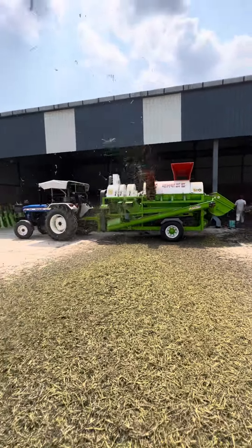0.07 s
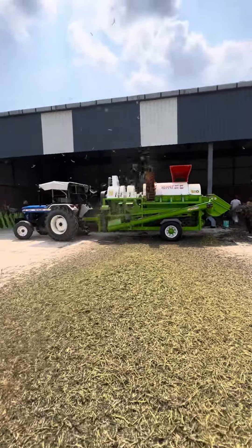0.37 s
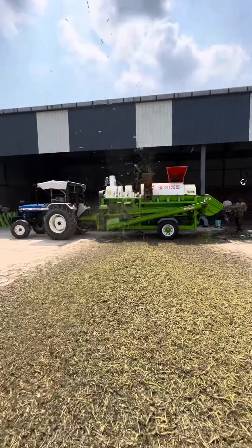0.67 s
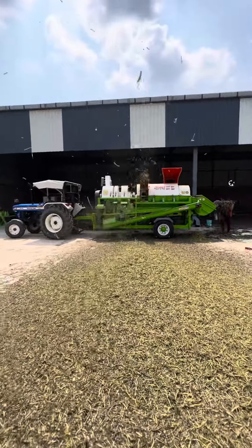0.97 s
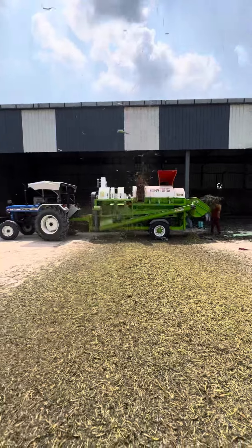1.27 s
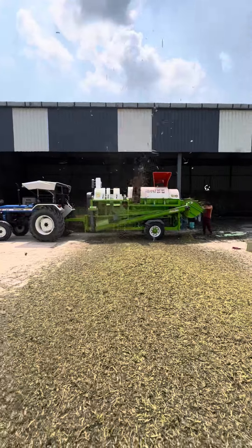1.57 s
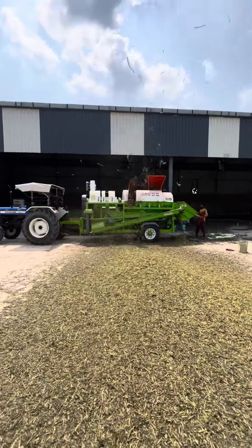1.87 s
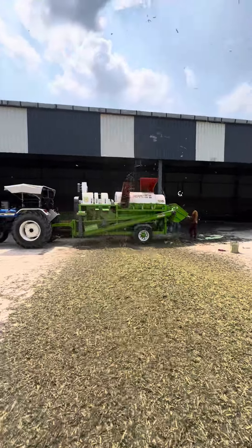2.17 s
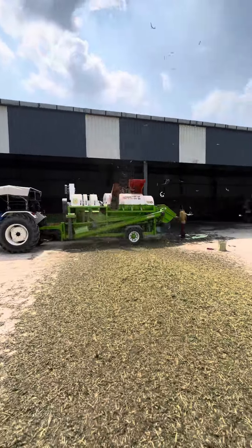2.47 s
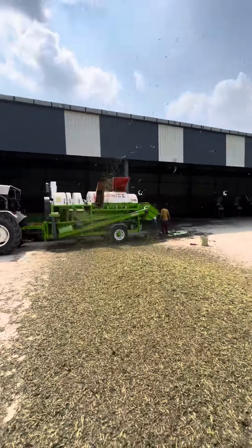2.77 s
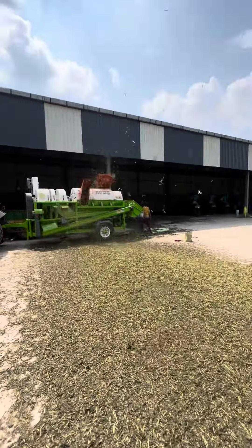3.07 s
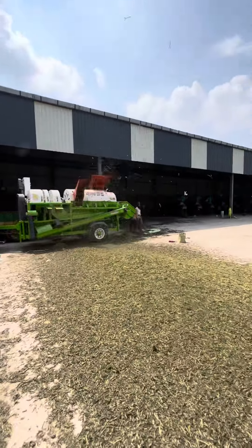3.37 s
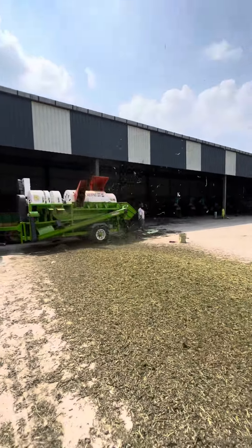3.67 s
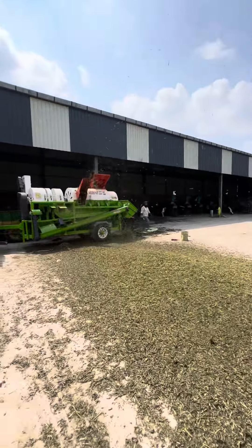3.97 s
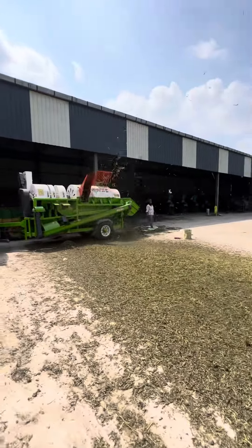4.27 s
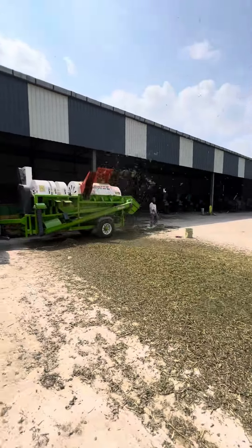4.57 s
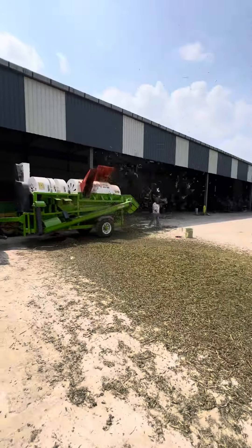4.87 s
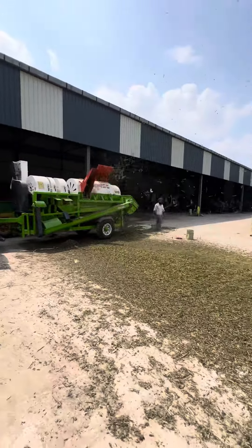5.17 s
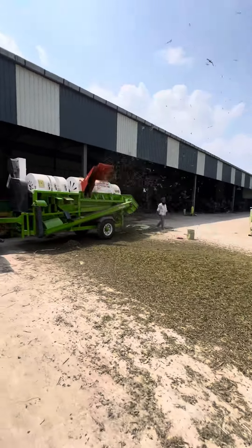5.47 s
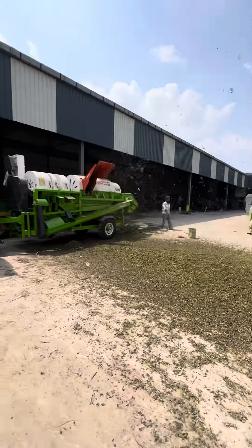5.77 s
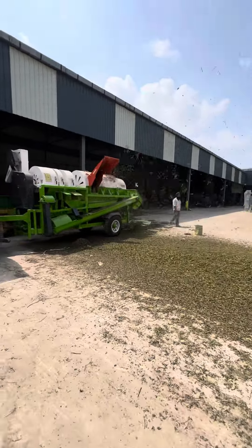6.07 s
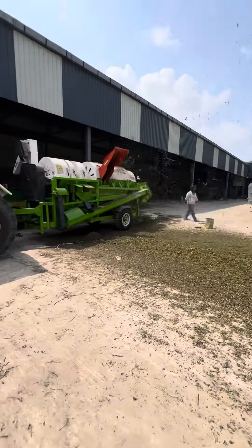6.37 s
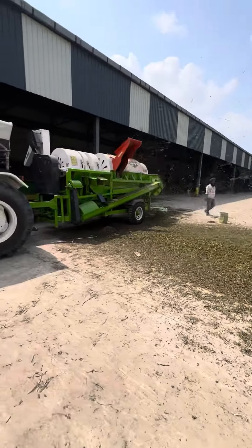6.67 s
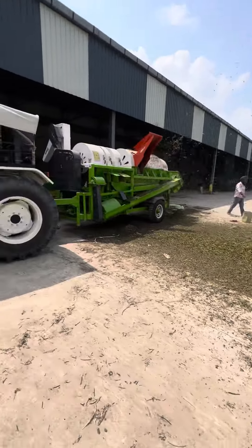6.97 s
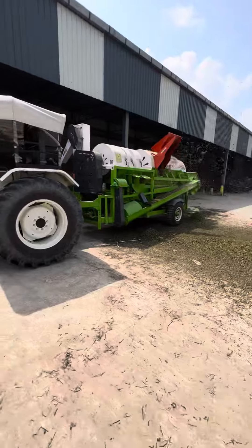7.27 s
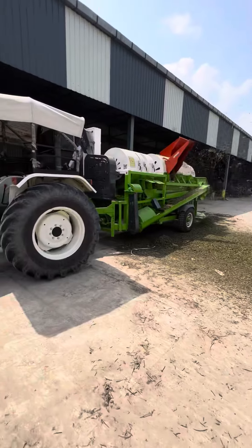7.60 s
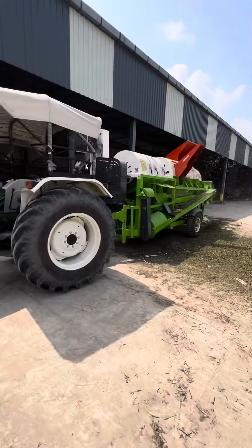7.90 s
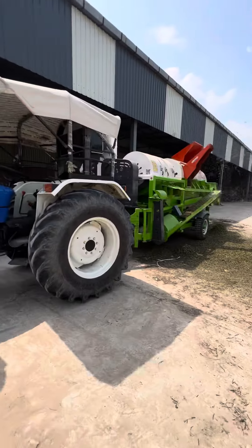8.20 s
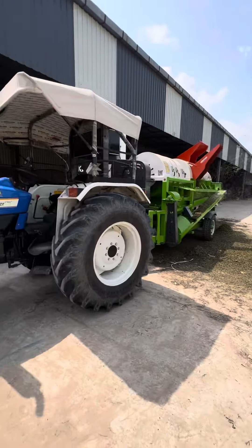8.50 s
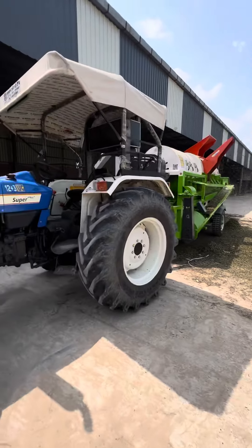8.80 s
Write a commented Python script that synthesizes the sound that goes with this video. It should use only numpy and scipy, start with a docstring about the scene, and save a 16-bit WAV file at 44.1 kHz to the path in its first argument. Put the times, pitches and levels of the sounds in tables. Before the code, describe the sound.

A diesel tractor drones and throbs while the thresher it drives grinds crop, rattles and hisses out chaff.

```python
"""A straw-covered yard in front of an open shed, walking towards a diesel tractor that drives a thresher.
The exhaust drones and throbs slowly against the beaters of the threshing drum; each firing knocks the
engine block. Crop grinds through the drum and rattles its steel panels, chaff hisses from the outlet
and hard bits ping off it. Early on, a few gusts buffet the two microphone ports."""
import sys
import numpy as np
from scipy import signal
from scipy.fft import rfft, irfft, next_fast_len
from scipy.io import wavfile
from scipy.ndimage import uniform_filter1d

SR = 44100
rng = np.random.default_rng(int(sys.argv[2]) if len(sys.argv) > 2 else 0)


def inscribe(sig):
    """Save sig as 16-bit PCM at rate SR to the path in sys.argv[1].

    A 1-D sig is mono; a 2-D sig holds one channel per row.
    Samples are clipped to [-1, 1] before scaling.
    """
    pcm = np.round(np.clip(np.atleast_2d(sig).T, -1, 1) * 32767)
    wavfile.write(sys.argv[1], SR, pcm.astype(np.int16))


N = 398663
T = np.arange(N) / SR
SIZE = next_fast_len(N, True)
FREQS = np.maximum(np.arange(SIZE // 2 + 1) * SR / SIZE, 1)
DRUM_RATIO, FAN_RATIO = .67533, .375  # shaft turns per firing

# The walk. Each row: time in seconds, place (0 far off, 1 by the thresher, 2 beside the tractor).
WALK = [(0, -0.5), (1.4, -0.8), (3.6, 1.17), (5.2, 0.8), (7.4, 2), (9.04, 4)]
# Perspective. Each row: time in seconds, metres to the tractor, metres to the thresher.
DISTANCE = [(0, 11.4, 10.6), (1.5, 10.8, 10.2), (2.7, 9.3, 10.1), (4.3, 8.5, 5.8), (5.3, 6.8, 5.7),
            (6.2, 6, 5.23), (7.4, 5.45, 5.16), (9.04, 3.9, 5.34)]
# Stereo image at the ports. Each row: frequency in Hz, coherence from 0 to 1, left lead in radians,
# left minus right in dB.
PORT_IMAGE = [(55, 1, 0, -0.3), (72, 1, 0, 0.6), (106, 1, 0, -1), (346, 0.98, 0.17, -3),
              (474, 0.94, 1.14, -3.5), (620, 0.15, 0.73, 5), (750, 0.42, 0, 2.5), (1090, 0.91, 0.6, 1.7),
              (1400, 0.72, 0.4, 1.5), (1870, 1, -1, -1), (2200, 0.76, 1.34, -3), (2620, 0.3, 1.2, 3.5),
              (3480, 0.37, 3, 6), (4070, 0.7, 5.5, -1), (4800, 0.25, 5, 0.5), (4970, 0.43, 3, -1),
              (5240, 0.27, 5.5, 0.5), (6450, 0.99, 6.5, 1.5), (7240, 0.97, 6.6, 0.5), (8350, 0.6, 7.5, 1),
              (9800, 0.95, 6.5, 1), (10800, 0, 12.5, 0)]
# Gusts on the ports. Each row: centre in seconds, half length in seconds, level in dB.
GUSTS = [(.76, 0.049, -37), (1.02, 0.1, -23.5), (1.58, 0.094, -22), (1.72, 0.045, -28.5),
         (1.9, 0.066, -22.5), (2.2, 0.083, -24.5), (2.53, 0.09, -31), (2.75, 0.027, -29), (3.5, .06, -45)]

# EQ curves for the noise layers. Each row: frequency in Hz, gain in dB.
WIND_EQ = [(25, -28), (50, -9), (100, -1), (200, -9), (450, -17.5), (1000, -27), (2500, -82)]
CHAFF_EQ = [(3800, -9.5), (5000, -2.5), (5500, -1.5), (6200, -1), (7200, -2), (8300, -1.5), (9500, -3),
            (10500, -3.5), (11100, -9), (15000, -54)]
CROP_EQ = [(1200, -3), (1700, -2.5), (2000, 0.5), (2300, 2), (2800, -1), (3300, -2.5), (3700, -3.5),
           (4200, -8), (4700, -8.5), (6500, -18.5)]
PANEL_EQ = [(650, -33), (900, 6), (980, -1.5), (1080, 4), (1170, 1), (1270, 3.5), (1430, -3.5), (1600, -1),
            (2300, -12.5)]
DRUM_EQ = [(330, -19.5), (500, -1), (600, -1), (690, 1), (780, -2), (860, -7), (1200, -22)]
BLOCK_EQ = [(20, -26), (42, -32), (65, 0), (100, -8), (150, -6), (220, -10), (330, -11), (450, -21.5),
            (800, -60)]
# Ringing metalwork. Each row: pitch in Hz, width in Hz, level in dB.
SPOUT_MODES = [(4160, 520, -2), (6080, 1200, 1), (7660, 1500, -4)]  # the chaff outlet
SHEET_MODES = [(1270, 88, 2.5), (1585, 66, -3.5), (1933, 160, -2.5), (2503, 92, -1), (2845, 130, -1),
               (3150, 200, -4.5)]  # steel sheets on the outlet side
GUARD_MODES = [(1606, 45, -4), (2050, 44, -2.5), (2540, 50, 1), (2690, 55, -0.5), (2930, 53, 0.5)]  # loose guards that stalks hit
COVER_MODES = [(1074, 7.2, 6.5), (1247, 29, -23), (1420, 90, 3)]  # the engine covers

# Hard bits hitting the outlet. Each row: time in seconds, ring peak in dB, spray peak in dB.
STRIKES = [(1.1947, -50, -43), (1.9994, -46, -40), (2.4294, -49, -41), (2.7267, -48, -42),
           (3.2794, -38, -49), (4.4, -39.5, -43), (5.072, -32, -37), (5.605, -33, -35), (6.635, -35, -41),
           (7.2394, -45, -41.5), (8.6194, -42, -38)]
# Wads of chaff whistling out. Each row: centre in seconds, half length in seconds, level in dB.
WHISTLES = [(3.35, .09, -50.5), (3.95, .14, -45.5), (4.28, .11, -46), (4.62, .09, -46.5),
            (5.05, .06, -45.5), (5.5, .2, -48), (8.5, .25, -47.5)]
# Gaps and one surge in the feed. Each row: centre in seconds, half length in seconds, change in dB.
FEED_CHANGES = [(2.18, 0.076, -1), (3.184, 0.045, -2), (4.616, .05, 2), (5.715, 0.043, -0.5),
                (6.381, .08, -0.5)]
# Clumps going through the drum. Each row: centre in seconds, half length in seconds, grinding in dB,
# panel rattle in dB.
CLUMPS = [(.08, .1, -35.5, -38.5), (1.76, .08, -42, -48), (2.01, .06, -34, -41), (2.32, .055, -34, -42),
          (2.7, .35, -38.5, -45), (3.68, .12, -38, -44), (3.96, .09, -35, -39), (4.42, .07, -34, -42),
          (4.79, .05, -34, -41), (5.1, .05, -34.5, -41), (5.33, .04, -36, -44), (5.51, .045, -32.5, -35.5),
          (5.91, .055, -32, -31), (6.2, .04, -37, -43)]
# Swells of ringing sheet metal. Each row: centre in seconds, half length in seconds, level in dB.
SHEET_SWELLS = [(2.4, 0.26, -42), (5.05, 0.087, -37), (5.25, 0.044, -34), (5.46, 0.03, -29),
                (5.92, 0.033, -29.5)]
# Quiet shaft tones. Each row: multiple of the shaft rate, level beside the tractor in dB.
DRUM_ORDERS = [(1, -40), (4, -44), (5, -38.5), (6, -39), (8, -50), (9, -40), (10, -41.5), (20, -38.5)]
FAN_ORDERS = [(3, -38), (4, -45), (5, -30.5), (6, -48)]

# Engine speed, sagging as crop is fed in. Each row: time in seconds, firing rate in Hz.
FIRING_RATE = [(0.0, 52.45), (0.6, 52.65), (1.3, 53.0), (2.0, 53.14), (2.7, 53.29), (3.4, 53.3),
               (4.1, 52.98), (4.8, 52.46), (5.5, 52.66), (6.3, 52.95), (7.3, 53.05), (8.2, 53.1),
               (9.04, 53.05)]
# The drone at twice the firing rate, fading and returning. Each row: time in seconds, level in dB.
DRONE_LEVEL = [(0, -22.5), (.8, -19.5), (1.56, -20), (1.68, -28), (2.1, -25), (2.33, -37), (2.6, -26),
               (3.08, -24), (3.26, -19), (4, -16), (5, -19), (7, -16.5), (8.3, -17.5), (8.55, -22),
               (8.75, -14.5), (9.04, -14.5)]
# Exhaust overtones. Each row: multiple of the firing rate, then level in dB far off, by the thresher
# and beside the tractor.
ENGINE_ORDERS = [(3, -40, -32.5, -44), (4, -45.5, -41, -41), (5, -77, -44, -37.5), (6, -42.5, -46, -40.5),
                 (7, -51.5, -48.5, -41), (8, -46, -44, -38), (9, -40, -42, -36), (10, -46, -64, -41),
                 (11, -44, -51, -39), (12, -45, -43.5, -53), (13, -44.5, -38, -47), (14, -73, -46, -42.5),
                 (17, -58, -53, -59), (19, -73, -69, -40), (20, -59, -52, -47.5), (22, -53, -52, -60),
                 (27, -51, -67, -50)]
# Spots on the walk where one overtone blooms. Each row: centre in seconds, half length in seconds,
# multiple of the firing rate, level in dB.
LOUD_SPOTS = [(0.21, 0.57, 6, -34.5), (0.18, 0.37, 3, -32.5), (0.32, 0.45, 8, -39.5), (.1, .3, 9, -44),
              (.6, 0.5, 5, -46), (0.36, 0.24, 11, -40), (0.14, 0.26, 17, -42), (1.25, 0.24, 9, -36),
              (1.2, 0.19, 8, -39), (1.32, 0.16, 6, -36.5), (2.5, 0.15, 9, -42.5), (2.6, .7, 15, -41.5),
              (3.4, 0.29, 9, -37), (3.8, 0.39, 13, -40), (3.6, .25, 8, -42), (3.6, 0.32, 4, -36.5),
              (4.25, 0.72, 5, -38), (4.6, 0.47, 3, -36), (5.58, 0.4, 5, -38.5), (6.6, 0.64, 3, -38),
              (6.64, .3, 5, -34.5), (6.1, 0.44, 13, -38), (6.7, 0.55, 4, -35.5), (5.86, 0.44, 15, -33.5),
              (5.8, 1.1, 17, -51), (6.02, 0.98, 8, -33.5), (5.85, 0.75, 11, -37), (6.3, 0.52, 20, -46.5),
              (6.6, 0.26, 9, -33), (6.67, 0.48, 19, -40.5), (6.9, 0.38, 7, -39), (8, 0.75, 6, -33.5),
              (8.3, 0.33, 7, -33), (8.25, 0.098, 4, -29), (8.55, 0.14, 4, -28), (8.953, 0.12, 4, -30),
              (8.9, 0.31, 3, -33), (8.6, 0.2, 7, -33)]


def undb(db):
    """Decibels to gain."""
    return 10 ** (np.asarray(db) / 20)


def curves(table):
    """Each column of a time table as an automation curve, one value a sample."""
    times, *columns = np.transpose(table)
    return [np.interp(T, times, column) for column in columns]


def at_hz(table, hz):
    """Each column of a frequency table, read on a log axis."""
    freqs, *columns = np.transpose(table)
    return [np.interp(np.log(hz), np.log(freqs), column) for column in columns]


def bell(centre_s, half_s):
    """A bell-shaped envelope that peaks at 1."""
    return np.exp(-((T - centre_s) / half_s) ** 2)


def swells(table):
    """Gain of bell-shaped swells, added in power."""
    return np.sqrt(sum(undb(2 * db) * bell(s, half) for s, half, db in table) + 1e-18)


def wander(rate):
    """Smooth random modulation of spread near 1, changing rate times a second."""
    hold = max(int(SR / rate), 2)
    steps = np.random.default_rng(rng.integers(2 ** 31)).standard_normal(N // hold + 2)
    ramps = uniform_filter1d(np.repeat(steps, hold), hold)
    return np.sqrt(2) * uniform_filter1d(ramps, hold)[:N]


def flicker(db, rate):
    """Gain that wavers at random by about db."""
    return undb(db * wander(rate))


def impacts(rate, spread_db):
    """Two unrelated showers of tiny, uneven impacts, rate a second in each."""
    hit = rng.random((2, N)) < rate / SR
    size = np.clip(rng.standard_normal((2, N)), -2.2, 2.2)
    return hit * rng.standard_normal((2, N)) * undb(spread_db * size)


def bursts(turns, depth, decay):
    """Gain that jumps once a turn and dies away; decay is a share of the turn."""
    return 1 + depth * np.exp(-(turns % 1) / decay)


def eq(table):
    """Gain per frequency; nothing passes outside the table."""
    return undb(at_hz(table, FREQS)[0]) * (FREQS > table[0][0]) * (FREQS < table[-1][0])


def resonance(hz, width_hz):
    """Response of one steep-sided mode."""
    return 1 / (1 + 1j * (FREQS ** 2 - hz ** 2) / (FREQS * width_hz)) ** 2


def resonances(modes):
    """Gain per frequency of a bank of modes."""
    return np.sqrt(sum(np.abs(undb(db) * resonance(hz, width)) ** 2 for hz, width, db in modes))


def along_walk(place_db):
    """Gain of a sound that beams to one side, given in dB far off, by the thresher and by the tractor."""
    return undb(np.interp(curves(WALK)[0], np.arange(len(place_db)), place_db))


def from_afar(metres, db, rolloff_db):
    """Gain that is db at 5 metres and loses rolloff_db with each doubling of distance."""
    return undb(db - rolloff_db * np.log2(metres / 5))


def overtone_gain(order, place_db):
    """Gain of one engine overtone along the walk, with its loud spots."""
    spots = swells([(s, half, db) for s, half, multiple, db in LOUD_SPOTS if multiple == order])
    return np.hypot(along_walk(place_db), spots)


def feed():
    """Gain of the crop noise, which follows the uneven feed."""
    return undb(sum(db * bell(s, half) for s, half, db in FEED_CHANGES))


def radiate(pair, response, far_diffuse_db=0.0):
    """Filter two noises into direct and diffuse stereo at unit level; the diffuse can thin far off."""
    remoteness = np.maximum(1 - curves(WALK)[0], 0)
    direct, diffuse = rfft(np.array([pair[0], pair[1] * undb(far_diffuse_db * remoteness)]), SIZE)
    coherence, lead, balance_db = at_hz(PORT_IMAGE, FREQS)
    mid = np.sqrt(1 + coherence) * direct * response
    side = np.sqrt(np.maximum(1 - coherence, 0)) * diffuse * response
    left = (mid + side) * undb(balance_db / 2)
    right = (mid - side) * undb(-balance_db / 2) * np.exp(-1j * lead)
    stereo = irfft(np.array([left, right]), SIZE)[:, :N]
    return stereo / np.std(stereo.mean(axis=0))


def tone(turns, gain, flutter=0., rate=6., scatter_rad=np.pi, drift_rad=0.):
    """A turning part's sine in stereo; reflections scatter and drift its phase and make it flutter."""
    hz = turns[-1] / T[-1]
    _, lead, balance_db = at_hz(PORT_IMAGE, hz)
    angle = 2 * np.pi * (turns % 1)
    if drift_rad:
        angle += drift_rad * np.interp(T, np.arange(10), rng.standard_normal(10))
    if flutter:
        flutter *= 1 + hz / 1000  # high tones flutter more
        angle += scatter_rad * rng.uniform(-0.99, 1) + flutter * wander(rate)
        gain = gain * np.abs(1 + flutter * wander(rate)) / np.hypot(1, flutter)
    stereo = [undb(side * balance_db / 2) * np.sin(angle + side * lead / 2) for side in (1, -1)]
    return gain * np.sqrt(2) * np.array(stereo)


def wind(common_db=-11):
    """Ragged low buffeting: eddies mostly push on one port while they pull at the other."""
    eddies = irfft(rfft(rng.standard_normal((2, N)), SIZE) * eq(WIND_EQ), SIZE)[:, :N]
    common, opposed = eddies / np.std(eddies) * swells(GUSTS) * flicker(db=8.5, rate=35)
    return np.array([undb(common_db) * common + side * opposed for side in (1, -1)])


def strikes(decay_s=0.03, rise_s=0.0074):
    """Hard bits hit the outlet, which rings, and scatter in a short bright spray."""
    envelopes = [np.exp(-np.abs(T - s) / np.where(T < s, rise_s, decay_s)) for s, _, _ in STRIKES]
    ring_gain, spray_gain = undb(np.transpose(STRIKES)[1:]) @ np.array(envelopes)
    bits = impacts(24000, spread_db=1.4)
    ring = radiate(bits, resonance(hz=6300, width_hz=890)) * ring_gain
    spray = radiate(bits, resonance(hz=8500, width_hz=4500)) * spray_gain
    return ring + spray


def spout(drum):
    """Chaff hisses through the outlet, which beams to one side and whistles whenever a wad passes."""
    spray = impacts(24000, spread_db=1.2) * bursts(drum, depth=0.2, decay=0.15)
    hiss = radiate(spray, resonances(SPOUT_MODES)) * along_walk((-54, -42, -53))
    whistle = radiate(spray, resonance(hz=4170, width_hz=430)) * swells(WHISTLES)
    return hiss + whistle * flicker(db=-1.5, rate=21)


def whine(firings, order=15):
    """A tone that beams from the thresher, shaken into a rough howl."""
    rough = flicker(db=3, rate=160)
    rough /= np.sqrt(np.mean(rough ** 2))
    turns = order * firings + .07 * wander(70)
    return tone(turns, overtone_gain(order, (-47, -35, -46)), flutter=.17, rate=12) * rough


def crop(drum, thresher_m):
    """Stalks crack in the drum in clumps; chaff puffs out each turn, more distinctly from close by."""
    closeness = curves(WALK)[0] / 2
    cracks = impacts(12000, spread_db=1.8) * bursts(drum, depth=0.053 + 0.33 * closeness, decay=0.96)
    cracks *= flicker(db=1, rate=45)
    clumps = swells([(s, half, db) for s, half, db, _ in CLUMPS])
    grind = radiate(cracks, eq(CROP_EQ)) * np.hypot(from_afar(thresher_m, db=-34, rolloff_db=3.6), clumps)
    puffs = impacts(32000, spread_db=1.8) * bursts(drum, depth=0.2 + 0.27 * closeness ** 2, decay=0.12)
    puffs *= flicker(db=0.9, rate=48)
    chaff = radiate(puffs, eq(CHAFF_EQ)) * from_afar(thresher_m, db=-37, rolloff_db=5.8)
    return grind * feed() + chaff


def sheets_and_guards(clump_ring_db=-11):
    """Crop keeps the steel sheets ringing, harder under a clump, and stalks ping off the loose guards."""
    clumps = swells([(s, half, db + clump_ring_db) for s, half, db, _ in CLUMPS])
    sheets = radiate(impacts(9000, spread_db=1.4), resonances(SHEET_MODES))
    sheets *= np.hypot(along_walk((-46.5, -40, -45)) * flicker(db=1.1, rate=9), clumps)
    ring = radiate(rng.standard_normal((2, N)), resonance(hz=1284, width_hz=48)) * swells(SHEET_SWELLS)
    pings = radiate(impacts(110, spread_db=1.9), resonances(GUARD_MODES))
    pings *= along_walk((-46.5, -42.5, -47))
    return (sheets + pings) * feed() + ring


def panel_rattle(chugs, thresher_m):
    """The thresher's panels rattle in time with the engine and flare up under each clump."""
    shaking = rng.standard_normal((2, N)) * bursts(2 * chugs, depth=0.59, decay=0.13)
    shaking *= bursts(chugs, depth=0.24, decay=.3)
    clumps = swells([(s, half, db) for s, half, _, db in CLUMPS])
    gain = np.hypot(from_afar(thresher_m, db=-32, rolloff_db=6.9), clumps)
    return radiate(shaking, eq(PANEL_EQ)) * gain


def drum_roar(thresher_m):
    """The drum housing roars in the midrange, growing more diffuse near the shed."""
    roar = radiate(rng.standard_normal((2, N)), eq(DRUM_EQ), far_diffuse_db=-5)
    return roar * from_afar(thresher_m, db=-29, rolloff_db=4.4)


def shafts(firings, drum, tractor_m):
    """Drum and fan hum; three beaters pass just above twice the firing rate, so the drone throbs."""
    hum_gain = from_afar(tractor_m, db=-24.5, rolloff_db=6.7)  # grows towards the drive shaft
    hum = tone(2 * drum, hum_gain)
    beaters = tone(3 * drum, along_walk((-41, -29, -37)))
    nearness = hum_gain / hum_gain.max()
    for turns, orders in ((drum, DRUM_ORDERS), (FAN_RATIO * firings, FAN_ORDERS)):
        for order, db in orders:
            hum += tone(order * turns, nearness * undb(db), flutter=.16)
    return hum + beaters


def engine_clatter(chugs, tractor_m):
    """Each firing knocks the block, which rumbles; close by, the covers ring and the bay growls."""
    knocks = impacts(12000, spread_db=1.6) * bursts(chugs, depth=0.25, decay=0.27)
    rumble = radiate(knocks, eq(BLOCK_EQ)) * from_afar(tractor_m, db=-28.5, rolloff_db=4.2)
    ring = radiate(knocks, resonances(COVER_MODES)) * from_afar(tractor_m, db=-38.5, rolloff_db=9.4)
    growl = radiate(impacts(12000, spread_db=1.2), resonance(hz=336, width_hz=194))
    return rumble + ring + growl * from_afar(tractor_m, db=-34.5, rolloff_db=10.3)


def exhaust(firings, chugs, tractor_m, dip):
    """Nearly even firings make a bass note and a drone an octave up; overtones round out each chug."""
    limp = 1 + 0.027 * np.cos(np.pi / 2 * firings)  # every fourth firing hits a little harder
    force = flicker(db=0.27, rate=22) * limp
    bass = tone(firings, from_afar(tractor_m, db=-18.5, rolloff_db=6))
    drone = tone(2 * firings, undb(curves(DRONE_LEVEL)[0]))
    overtones = np.zeros((2, N))
    for order, *place_db in ENGINE_ORDERS:
        gain = overtone_gain(order, place_db)
        overtones += tone(order * chugs, gain, flutter=.1, scatter_rad=1.8, drift_rad=1)
    return force * (bass + drone) + dip * overtones


def scene(gust_duck_db=-4, dip_db=-10):
    """The mix: one engine speed turns every shaft, and the clatter ducks under the gusts."""
    firings = np.cumsum(curves(FIRING_RATE)[0]) / SR  # running phase, in turns
    chugs = firings - .32  # the chug lands about a third of a cycle later
    drum = DRUM_RATIO * firings + 4 / 9  # the offset places the throb
    tractor_m, thresher_m = curves(DISTANCE)
    gust = swells(GUSTS)
    duck = undb(gust_duck_db * gust / gust.max())
    dip = undb(dip_db * bell(1.61, half_s=.06))  # overtones, clatter and roar dip briefly
    tractor = exhaust(firings, chugs, tractor_m, dip) + engine_clatter(chugs, tractor_m) * dip * duck
    machinery = shafts(firings, drum, tractor_m) + whine(firings) + drum_roar(thresher_m) * dip
    metalwork = panel_rattle(chugs, thresher_m) + sheets_and_guards()
    harvest = crop(drum, thresher_m) + spout(drum) + strikes()
    return tractor + machinery + metalwork + harvest + wind()


def record(dry):
    """A steep low-pass takes off the top above 11.3 kHz."""
    return signal.sosfilt(signal.ellip(10, .2, 80, 11300, fs=SR, output="sos"), dry)


dry = scene()
out = record(dry)
inscribe(out)
```